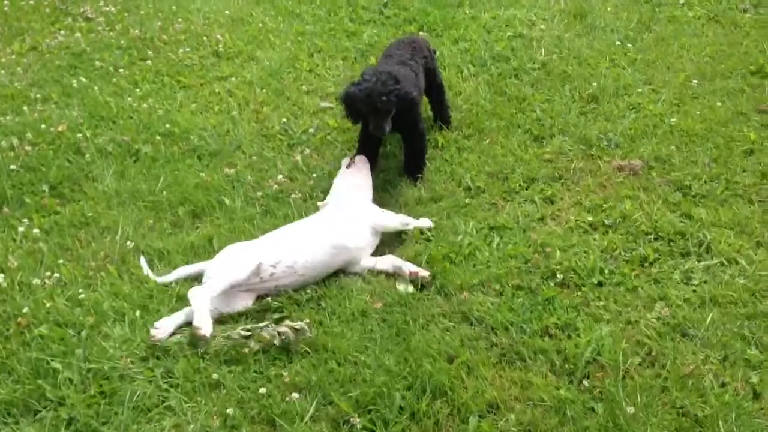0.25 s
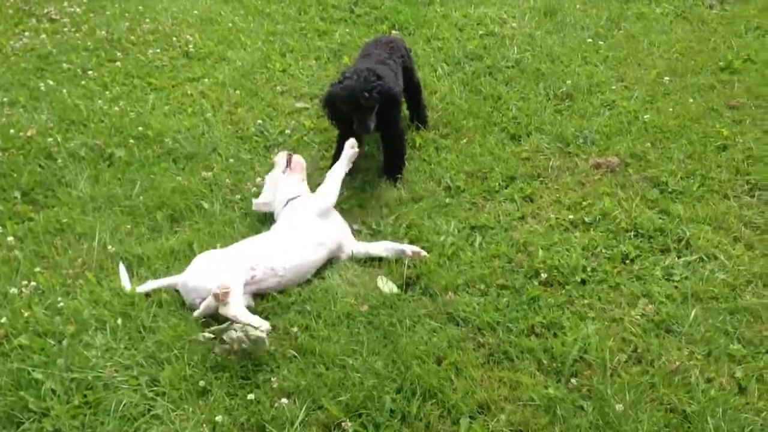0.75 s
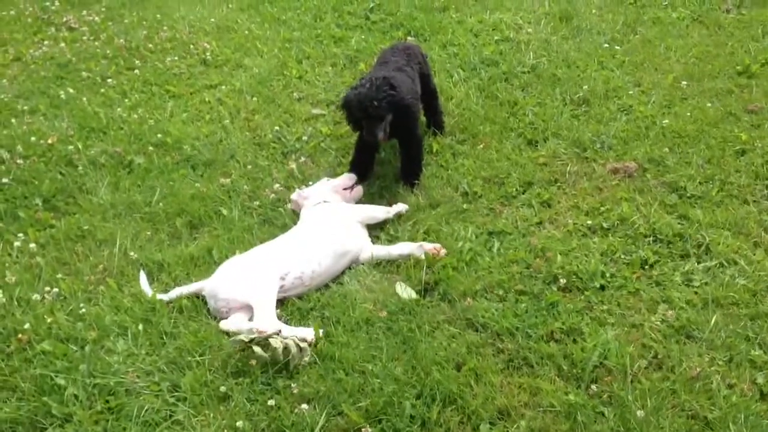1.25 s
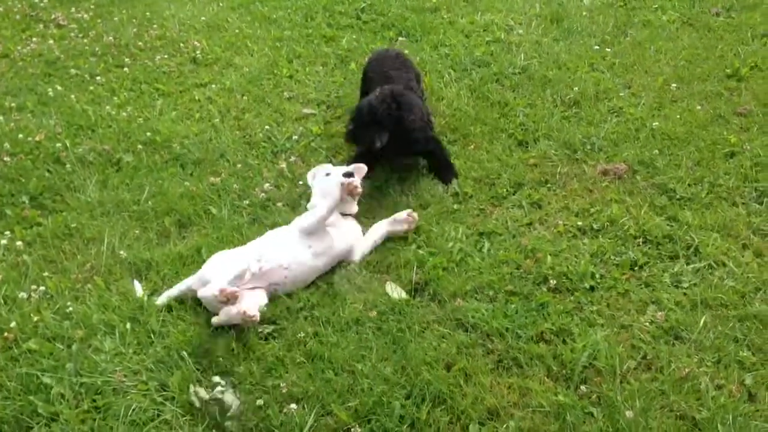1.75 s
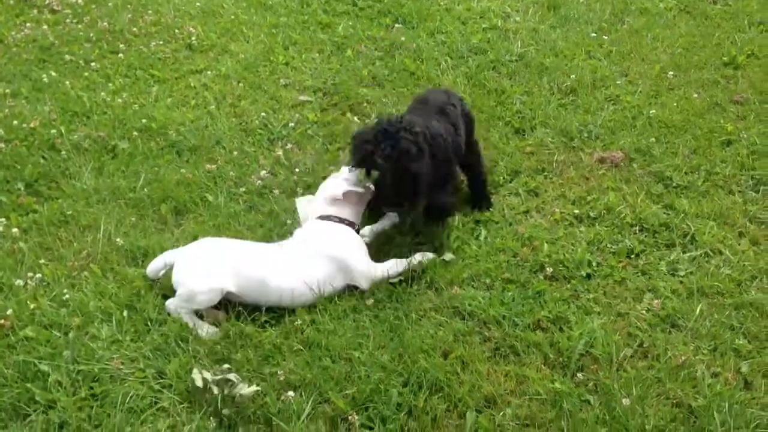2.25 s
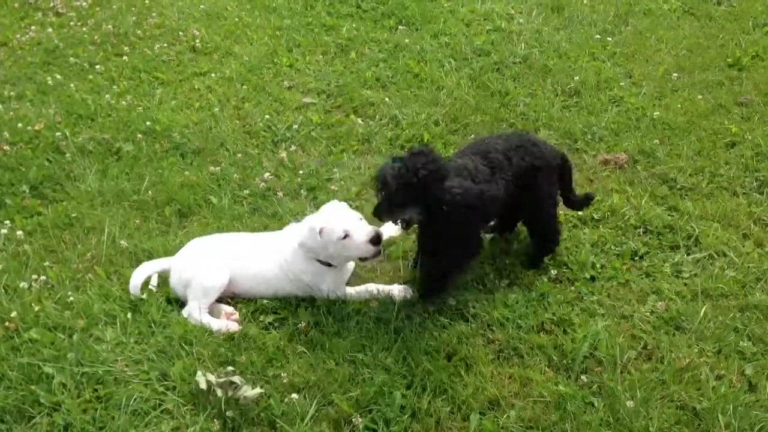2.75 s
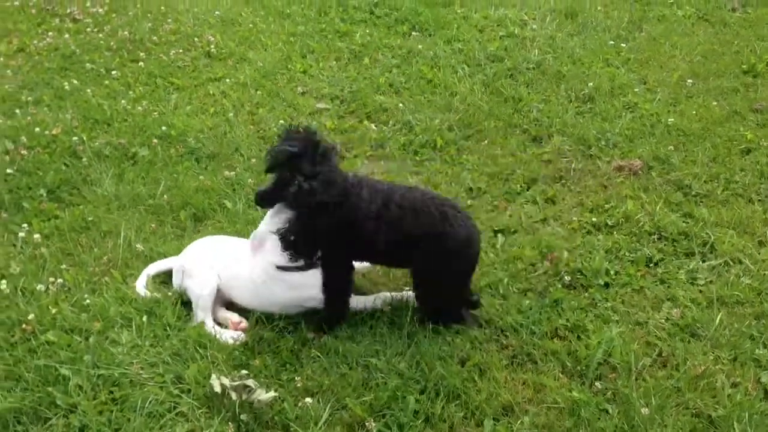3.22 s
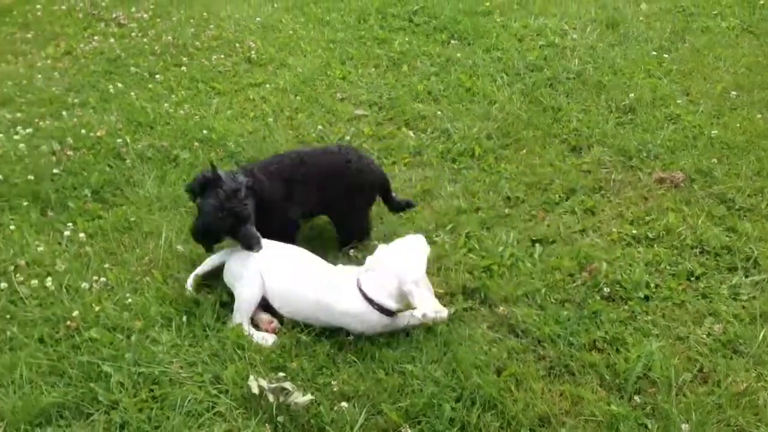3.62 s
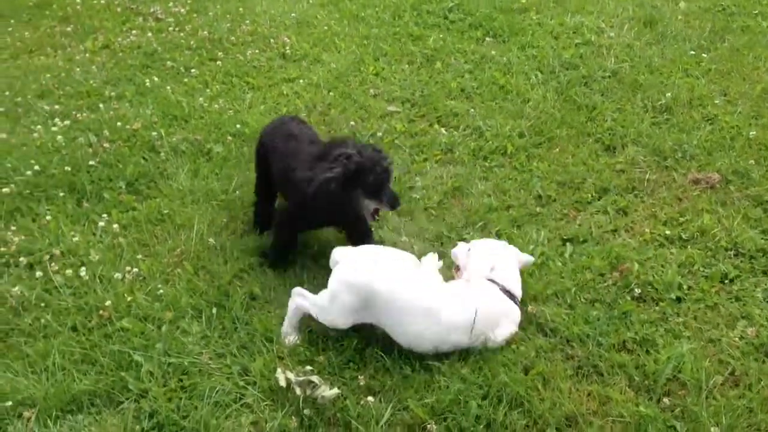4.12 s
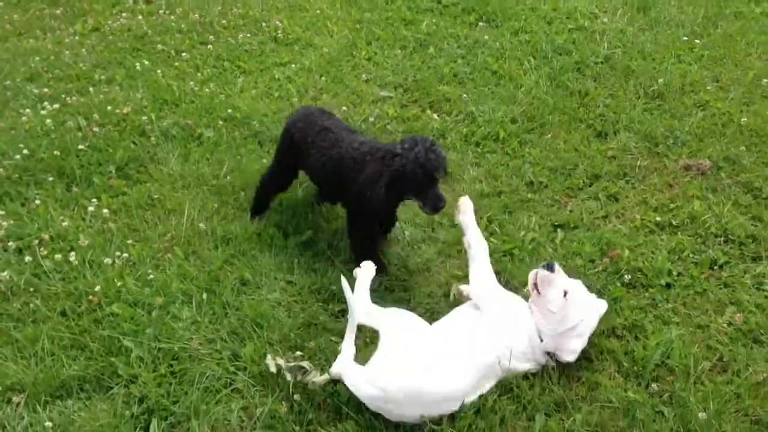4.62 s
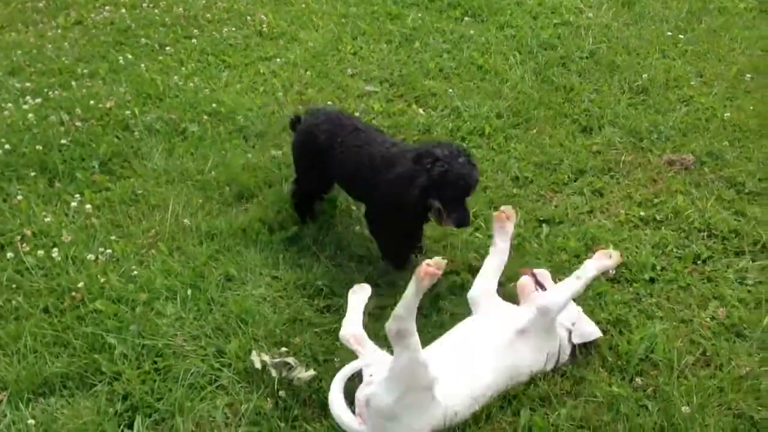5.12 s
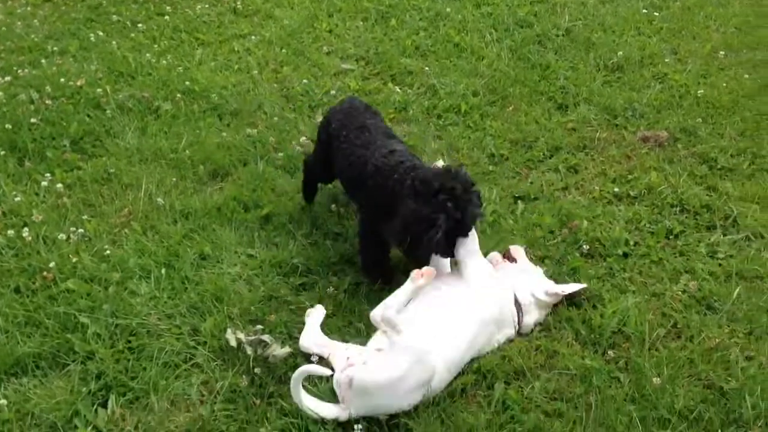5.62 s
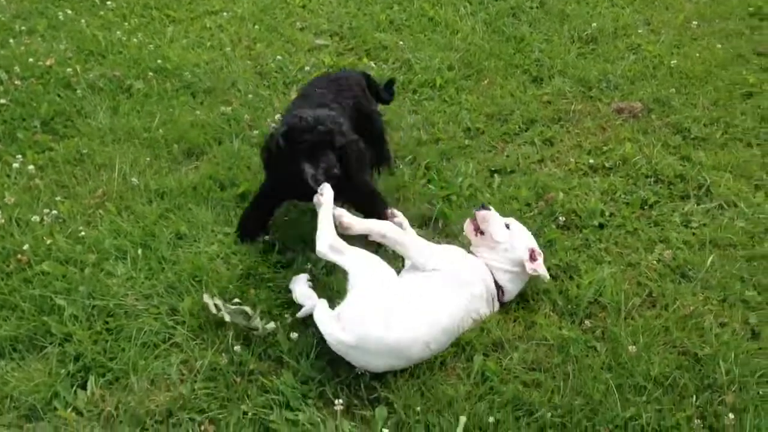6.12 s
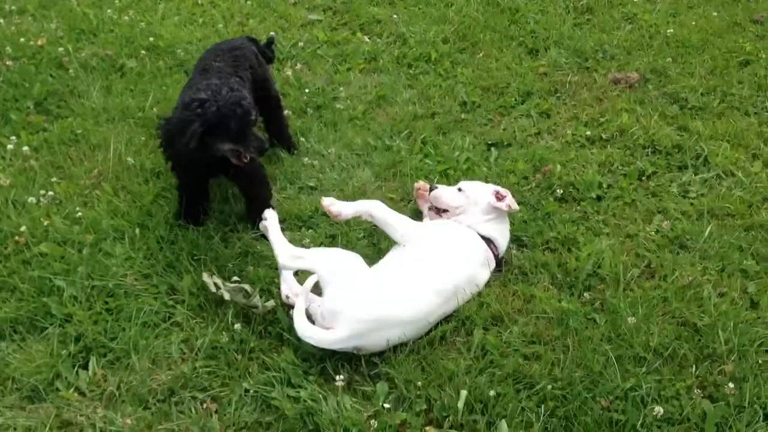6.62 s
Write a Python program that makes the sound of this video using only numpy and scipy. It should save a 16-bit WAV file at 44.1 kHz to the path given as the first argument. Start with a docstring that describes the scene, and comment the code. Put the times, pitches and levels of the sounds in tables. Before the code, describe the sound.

Outdoors on a lawn, with a faint airy hush like distant traffic, dogs tussle. Grass swishes and bodies bump dull turf; a piercing, very short bark jumps out. Low grunts and raspy growls answer it. After a quieter stretch with tiny wet clicks, a broken growl leads to an even higher yelping bark. Panting huffs end it. Simple mono pickup at modest distance, almost no reverberation, peaks squashed.

```python
"""Two dogs wrestle on a lawn: two shrill barks and throaty growls, voiced as harmonics shaped by resonances.
Breath huffs are swelling noise bands; mouth clicks and thuds on turf are short bursts of a few cycles.
Grass rustles as dense uneven snaps, over a soft outdoor hush of spectrally shaped noise.
A faint decaying tail and two echoes follow the dogs' voices, breath and clicks.
The recorder cuts bass and top, turns down on loud sound, recovers slowly and limits peaks."""
import sys
import numpy as np
from scipy import signal
from scipy.fft import rfft, irfft
from scipy.io import wavfile
from scipy.ndimage import uniform_filter1d, minimum_filter1d

SR = 44100
rng = np.random.default_rng(int(sys.argv[2]) if len(sys.argv) > 2 else 0)


def output_pcm(signal):
    """Save a mono or channel-first signal as 16-bit PCM at the path in sys.argv[1].

    Samples are clipped to [-1, 1] before scaling.
    """
    pcm = np.clip(np.atleast_2d(signal).T, -1, 1) * 32767
    wavfile.write(sys.argv[1], SR, np.round(pcm).astype(np.int16))


N = 302526


def from_db(db):
    """Amplitude ratio of a level: 20 dB per factor of ten."""
    return 10 ** (np.asarray(db) / 20)


def rms_one(x):
    """Normalise the root mean square, the square root of mean power, to 1."""
    return x / np.sqrt(np.mean(x ** 2) + 1e-20)


def at_hz(points, hz):
    """Interpolate a spectrum on a logarithmic frequency axis."""
    point_hz, point_db = np.array(points).T[:2]
    return np.interp(np.log(hz), np.log(point_hz), point_db)


def in_time(rows):
    """Linear interpolation in time turns table columns into sample curves."""
    s, *columns = np.transpose(rows)
    return [np.interp(np.arange(N) / SR, s, c) for c in columns]


def phrases(tables, fade_s):
    """Gating: join tables into curves and close a gate over pauses longer than 40 ms."""
    rows = np.concatenate(tables)
    t, gate = np.arange(N) / SR, np.zeros(N)
    for table in tables:
        gate[(t >= table[0][0]) & (t <= table[-1][0])] = 1
    bridge = SR // 25
    widened = -minimum_filter1d(-gate, size=bridge)
    gate = minimum_filter1d(widened, size=bridge)
    return uniform_filter1d(gate, size=max(int(fade_s * SR), 1)), in_time(rows)


def per_phrase(tables, constants):
    """Append to each row the constants of its phrase and its linear progress in time, 0 to 1."""
    extended = []
    for table, fixed in zip(tables, constants):
        start, end = table[0][0], table[-1][0]
        extended.append([(*row, *fixed, (row[0] - start) / (end - start)) for row in table])
    return extended


def drift(rate, size=N):
    """Low-pass random fluctuation: white noise through two equal poles at rate (Hz), rms 1."""
    r = np.exp(-2 * np.pi * rate / SR)
    settle = SR // 4
    noise = rng.standard_normal(size + settle)
    return rms_one(signal.lfilter([1], [1, -2 * r, r * r], noise)[settle:])


def resonance(x, hz, width_hz):
    """Damped resonator: a two-pole peak with gain 1 on top."""
    r = np.exp(-np.pi * width_hz / SR)
    edge = (1 - r * r) / 2
    return signal.lfilter([edge, 0, -edge], [1, -2 * r * np.cos(2 * np.pi * hz / SR), r * r], x)


def coloured(x, spectrum):
    """Spectral shaping: multiply the Fourier transform by a gain curve."""
    hz = np.maximum(np.fft.rfftfreq(N, 1 / SR), 1)
    return irfft(rfft(x) * from_db(at_hz(spectrum, hz)), N)


def noise_band(centre, width_hz):
    """Quadrature modulation: two slow noises carry a noise band to a moving centre."""
    turn = 2 * np.pi * np.cumsum(centre) / SR
    in_phase = drift(width_hz / 2, size=len(turn)) * np.cos(turn)
    return in_phase + drift(width_hz / 2, size=len(turn)) * np.sin(turn)


def swell(start, rise_s, fall_s, shape):
    """Smooth envelope: a power of a sine rises to 1 and falls again."""
    ramp = np.interp(np.arange(N) / SR, [start, start + rise_s, start + rise_s + fall_s], [0, 1, 0])
    return np.sin(np.pi / 2 * ramp) ** (2 * shape)


def throat(phase, pitch, centre, width_hz, noisy):
    """Source and filter: a resonance passes nearby harmonics and a share of air puffed each cycle."""
    tone, power = 0, 0
    for k in range(1, 24):
        gain = 1 / (1 + (2 * (k * pitch - centre) / width_hz) ** 2) ** 1.37
        tone = tone + gain * np.sin(k * phase - .35 * k * k)   # staggered phases
        power = power + gain ** 2 / 2
    air = noise_band(centre, width_hz) * (1 + .5 * np.cos(phase))
    noisy = np.clip(noisy, 0, 1)
    return np.sqrt(1 - noisy ** 2) * tone / np.sqrt(power) + noisy * air


def knocks(rows, cycles):
    """Damped contact: each event is a short swell of a few cycles at its own frequency."""
    out = np.zeros(N)
    for s, peak_db, hz in rows:
        t = np.arange(int(cycles / hz * SR)) / SR
        at = int(s * SR)
        envelope = np.sin(np.pi * t / t[-1]) ** 2
        out[at:at + len(t)] += from_db(peak_db) * envelope * np.cos(2 * np.pi * hz * t)
    return out


def hush():
    """Broadband ambience of far traffic and air: shaped noise, lumpy in the bass, fuller in the middle at first."""
    # spectrum of the hush: f/Hz, relative density/dB
    hush_spectrum = [(24, -65), (40, -37), (91, -13), (154, 1.5), (406, -11.5), (686, -9), (816, -12),
                     (880, -10), (2050, -12), (2570, -15), (4340, -17.5), (9630, -23.5), (15500, -30)]
    # hush over time: t/s, level/dB, extra level in the middle range/dB
    hush_level = [(0, -61.5, 8.5), (.8, -58.5, 6), (1.6, -59, 3.5), (2.5, -57.5, -1.6), (3.7, -57, -1.6),
                  (4.5, -56, -1.8), (5.4, -55.5, -3), (6.1, -58, -3), (6.86, -59.5, 0.5)]
    level_db, middle_db = in_time(hush_level)
    air = rms_one(coloured(rng.standard_normal(N), hush_spectrum))
    bass = signal.sosfilt(signal.butter(2, 330, fs=SR, output="sos"), air)
    middle = resonance(air, 490, 1500)
    lumps = (from_db(1.9 * drift(17)) - 1) * bass
    return from_db(level_db) * (air + lumps + (from_db(middle_db) - 1) * middle)


def rustle():
    """Superposed impulses: dense tiny blade snaps of uneven size merge into shaped noise."""
    # continuous stirring of grass under the dogs: t/s, level/dB
    stirring = [(0, -64.5), (.45, -63), (.8, -80), (2.9, -80.5), (3.2, -64), (3.7, -66.5), (4.7, -66.5),
                (5.0, -79.5), (6.86, -83.5)]
    # brief brushes of grass: start t/s, rise t/s, fall t/s, peak level/dB
    brushes = [(.1, 0.036, 0.05, -69), (.28, 0.05, 0.018, -54.5), (.52, 0.074, 0.16, -60),
               (.62, .08, 0.04, -57.5), (.93, 0.064, .1, -65), (2.11, 0.025, 0.034, -57.5),
               (2.239, .046, .08, -68), (2.41, 0.07, .04, -64), (3.1, 0.19, 0.32, -64),
               (4.4, .08, .06, -65), (4.8, 0.074, .04, -64)]
    # spectrum of the grass: f/Hz, relative density/dB
    grass = [(880, -21.5), (1500, 9), (2730, 3.5), (3150, 4.5), (5400, 6.5), (11700, 0.5), (15000, -0.5)]
    stirring_db, = in_time(stirring)
    level = from_db(stirring_db)
    for s, rise_s, fall_s, db in brushes:
        level = level + from_db(db) * swell(s, rise_s, fall_s, 1.6)
    snaps = rng.standard_normal(N) * from_db(1.8 * rng.exponential(1, N))
    return level * from_db(1.6 * drift(30)) * rms_one(coloured(snaps, grass))


def thuds():
    """Impact on a soft, lossy surface: turf swells at a low frequency and, weaker, at an overtone."""
    # paws and bodies on turf: t/s, peak level/dB, f/Hz
    contacts = [(0.126, -46.5, 170), (0.199, -41, 207), (0.264, -46.5, 156), (0.32, -48, 171),
                (0.587, -50, 136), (0.611, -50, 194), (0.643, -34, 184), (0.661, -41, 188),
                (0.694, -41.5, 148), (0.825, -45.5, 130), (1.131, -45, 140), (1.189, -37, 146),
                (1.207, -45, 175), (1.461, -49.5, 199), (4.182, -47, 177.6), (4.209, -58, 153),
                (4.375, -38.5, 162), (4.862, -47, 159), (5.278, -47, 168), (6.35, -50, 199.8),
                (6.365, -43.5, 204), (6.384, -44.5, 184.6)]
    overtone_ratio, overtone_db = 2.06, -14.5
    overtones = [(s, db + overtone_db, hz * overtone_ratio) for s, db, hz in contacts]
    return knocks(contacts, cycles=2.82) + knocks(overtones, cycles=3.8)


def growls():
    """Irregular vibration of slack folds: flutter adds side tones to the chest; mouth and teeth ring hoarsely."""
    # growls, a grunt and the chest tone leading into each bark, one list per phrase:
    # t/s, pitch f/Hz, chest level/dB, mouth level/dB, rasp level at palate and teeth/dB
    growl_phrases = [
        [(1.56, 214.4, -71, -72, -72), (1.59, 211.5, -63, -68, -71), (1.604, 217.6, -38, -72, -74),
         (1.632, 303.4, -32.5, -78, -82), (1.645, 318, -33, -70, -80)],
        [(2.245, 179.2, -59.5, -67.5, -81), (2.281, 196.9, -37, -68, -86), (2.325, 210, -39, -72, -86),
         (2.349, 175, -52, -73, -79), (2.37, 174.6, -68, -74, -76)],
        [(2.545, 250, -56, -59, -72.5), (2.56, 263, -36.5, -60.5, -62), (2.58, 272, -41.5, -54, -62),
         (2.62, 266, -46, -59, -59), (2.64, 268.9, -36, -47, -60), (2.68, 269.3, -39, -66, -72),
         (2.716, 271.9, -38, -66, -75), (2.74, 271, -39, -47.5, -60), (2.76, 309.4, -39, -44.5, -71),
         (2.786, 309.9, -46.5, -50.5, -50.5), (2.803, 299.8, -49, -59, -60), (2.81, 153.2, -45, -60, -63),
         (2.84, 151.1, -49.5, -67.5, -75), (2.88, 155.7, -72, -64.5, -72)],
        [(3.14, 243.9, -58.5, -66.5, -72), (3.18, 245.5, -47, -53, -71.5), (3.206, 245, -50, -59, -70),
         (3.25, 258.6, -42, -47, -58), (3.264, 267.8, -43, -42.5, -62), (3.29, 268.6, -47, -44, -58),
         (3.31, 232.3, -46, -52, -58), (3.345, 233.2, -50, -51.5, -52), (3.37, 251, -40.5, -36, -67),
         (3.386, 249, -53, -52.5, -53.5), (3.405, 250.8, -39, -39.5, -75), (3.425, 259.2, -56, -51, -58),
         (3.45, 248.7, -46, -51.5, -65), (3.5, 240.2, -47, -52.5, -61), (3.532, 183.6, -59, -55.5, -69),
         (3.6, 190.1, -73, -67.5, -73)],
        [(5.41, 169.9, -59, -66, -72), (5.432, 177.4, -43.5, -63, -77), (5.474, 231.7, -43.5, -61, -74),
         (5.5, 237, -53, -59, -69), (5.51, 172, -36.5, -57, -76), (5.528, 169, -33, -48.5, -72),
         (5.565, 224.8, -45.5, -47, -69), (5.62, 218.8, -42, -53.5, -68), (5.65, 196.5, -44.5, -58, -68),
         (5.704, 158.9, -39.5, -64, -72), (5.722, 160, -47, -65.5, -76), (5.742, 170.6, -31.5, -46, -68),
         (5.76, 170.7, -34, -50.5, -62), (5.79, 174.1, -32.5, -42.5, -67), (5.811, 177, -39, -33, -77),
         (5.816, 245.4, -29, -56, -70), (5.86, 241, -55, -52, -70)],
    ]
    # voice of each phrase: mouth f/Hz at start, at end, palate level above the teeth/dB at start, at end,
    # roughness (0-1), flutter f/Hz
    growl_voice = [(1000, 850, 0, 1.5, .4, 52), (1000, 1000, -3, 1.5, .08, 68),
                   (1000, 1350, 4.5, -26, 0.66, 83), (1117, 1200, -15, 0, .42, 70),
                   (904, 1100, 1, 3.5, .6, 65)]
    # resonances at palate and teeth: f/Hz, width/Hz
    palate_teeth = [(2300, 400), (3480, 520)]
    mouth_width_hz = 610
    gate, curves = phrases(per_phrase(growl_phrases, growl_voice), fade_s=.008)
    on = gate > 0
    (pitch, chest_db, mouth_db, teeth_db, first_hz, last_hz, palate_db, late_db,
     rough, flutter_hz, progress) = [c[on] for c in curves]
    rough = np.clip(rough, 0, 1)
    phase = 2 * np.pi * np.cumsum(pitch * (1 + 0.14 * rough * drift(59.77)[on])) / SR
    sides = 0
    for step, size in zip((1, -1, 2), (.65, .2, .3)):
        sides = sides + size * noise_band(pitch + step * flutter_hz, 45)
    chest = np.sin(phase) + 0.05 * np.sin(2 * phase) + rough * sides
    mouth_hz = first_hz + progress * (last_hz - first_hz)
    mouth = throat(phase, pitch, mouth_hz, mouth_width_hz, 0.94)
    rasp_levels_db = (teeth_db + palate_db + progress * (late_db - palate_db), teeth_db)
    teeth = 0
    for db, (hz, width) in zip(rasp_levels_db, palate_teeth):
        ring = throat(phase, pitch, np.full(len(pitch), hz), width, 0.93)
        teeth = teeth + from_db(db + 2.0 * drift(7.2)[on]) * ring
    upper = from_db(1.5 * drift(50)[on]) * (from_db(mouth_db) * mouth + teeth)
    out = np.zeros(N)
    out[on] = from_db(chest_db) * rms_one(chest) + upper
    # the chest radiates little below 120 Hz
    return signal.sosfilt(signal.butter(2, 120, "high", fs=SR, output="sos"), gate * out)


def wolf_tone(fold_pitch):
    """Biphonation: a second, independent vibration forms sum tones with the vocal folds."""
    # second vibration in the later bark: t/s, f/Hz, level of its own tone/dB
    second_vibration = [(5.868, 1012, -36), (5.9, 1030, -7.5), (5.914, 1030, -16.5), (5.918, 1012, -30)]
    gate, (hz, level_db) = phrases([second_vibration], fade_s=0.0062)
    turn = 2 * np.pi * np.cumsum(hz * (1 + 0.067 * drift(110))) / SR
    folds = 2 * np.pi * np.cumsum(fold_pitch) / SR
    tone = np.sin(turn) + 0.17 * np.sin(turn + folds) + .06 * np.sin(turn + 2 * folds)
    return np.sqrt(2) * gate * from_db(level_db) * tone


def barks():
    """Source-filter voice: fold harmonics excite five throat resonances, with hoarseness and hiss added."""
    # barks, one list each: t/s, pitch f/Hz, mouth size (factor on the resonances), first resonance level/dB,
    # then relative to it: second resonance level/dB, upper resonances level/dB, hiss level/dB
    bark_phrases = [
        [(1.606, 303.2, 1.28, -48.5, -1.5, -17, -30.5), (1.62, 317.7, 0.97, -19, 2, -11.5, -34),
         (1.626, 302, 0.96, -12.5, -6, -11, -34), (1.634, 318.6, 1.086, -11, -0.5, -8, -26.5),
         (1.644, 349.8, 0.97, -10.5, 0, -10.5, -22), (1.657, 381.8, 1.11, -8, 5.5, -5.5, -18.5),
         (1.661, 455, 1.01, -2.5, -0.5, -20, -32.5), (1.68, 455.2, 1, -6.5, 1.5, -7, -34),
         (1.7, 433.4, 0.95, -5.5, -3.5, -9.5, -37), (1.706, 421.1, 1, -6.5, -12, -9, -27),
         (1.716, 415.6, 1.06, -5.5, -26.5, -17, -29), (1.731, 410.8, 1.05, -10, -18.5, -11.5, -31),
         (1.738, 385.6, 1.04, -15, -2, -19, -35.5), (1.744, 325.6, 0.89, -27.5, 0, -3, -19.5),
         (1.775, 189.9, 1.02, -50.5, 5, -4.5, -8)],
        [(5.812, 298.3, 0.54, -38.5, 6, -2.5, -30.5), (5.83, 371.6, 0.64, -35, 11.5, -7.5, -37),
         (5.84, 458.1, 0.64, -28.5, 10.5, 0, -24), (5.85, 485.8, 0.59, -26.5, 17.5, -2.5, -20),
         (5.862, 598.2, .73, -21.5, 12, -3, -23), (5.876, 678, .88, -15, 8, -7.5, -23.5),
         (5.894, 724.7, 0.77, -15.5, 8.5, -20.5, -24), (5.912, 793, .98, -12.5, 4.5, -20, -26),
         (5.916, 756, .98, -14, 9, -19.5, -23.5), (5.934, 804, 1.01, -10, 0, -17, -29),
         (5.952, 803, 1.04, -9, -4, -15, -21.5), (5.957, 851.8, 1.04, -7.5, -15.5, -25.5, -29.5),
         (5.97, 861, 1.1, -7.5, -23.5, -29.5, -27.5), (5.979, 812.5, 0.89, -12.5, -6, -15.5, -34),
         (5.984, 706, 0.84, -16, 3.5, -24.5, -29.5), (5.99, 580.8, .8, -22, -5, -21, -29),
         (6.025, 258.9, 0.64, -50, -9, -4.5, -19.5)],
    ]
    # the five throat resonances of each bark at mouth size 1: f/Hz, low to high
    throat_hz = [(862, 1390, 2200, 3200, 5100), (773, 1560, 2350, 3600, 4900)]
    # per bark: fourth resonance level above the third/dB at start, middle, end;
    # fifth resonance level above the third/dB; hiss centre f/Hz at start, at end
    bark_top = [(-4.5, -14.5, -12, -24.5, 6200, 7600), (-23, 1, -2, -25.5, 8200, 7900)]
    # resonances, low to high: width/Hz, reach of hoarseness (factor), exponent on mouth size
    throat_shape = [(260, 1, 0.97), (296, 1.6, 1.0), (381, 2, 0.53), (705, 4.4, .6), (600, 2.4, 0.34)]
    # hoarseness of the barks: t/s, amount (0 clear, 1 and above rasping)
    hoarseness = [(1.606, .6), (1.625, .24), (1.645, .15), (1.659, .3), (1.668, .06), (1.735, .06),
                  (1.745, .25), (1.775, .4), (5.812, 1.6), (5.838, 1.2), (5.848, .45), (5.858, .14),
                  (5.88, .08), (5.895, .25), (5.912, .22), (5.925, .05), (5.975, .05), (6.0, .3)]
    throat_low_hz, dip_hz, dip_sharpness = 637.2, 5130, 9.5
    rasp_db = -23.5   # at hoarseness 1, relative to the voice
    # noisy share of a clear bark's hiss; level of broad air relative to the hiss resonance
    hiss_width_hz, hiss_noisy, air_db = 900, .55, -4

    gate, curves = phrases(per_phrase(bark_phrases, np.hstack([throat_hz, bark_top])), fade_s=0.0067)
    on = gate > 0
    (pitch, size, level_db, second_db, upper_db, hiss_db, *rest_hz, early_db, middle_db, late_db,
     fifth_db, first_hz, last_hz, progress, hoarse) = [c[on] for c in curves + in_time(hoarseness)]
    fourth_db = middle_db + (early_db - middle_db) * np.maximum(1 - progress / .4, 0)
    fourth_db = fourth_db + (late_db - middle_db) * np.maximum(progress / .5 - 1, 0)
    relative_db = [0 * second_db, second_db, upper_db, upper_db + fourth_db, upper_db + fifth_db]
    levels_db = level_db + np.array(relative_db)

    phase = 2 * np.pi * np.cumsum(pitch * (1 + 0.049 * hoarse * drift(180)[on])) / SR
    voice = 0
    for hz, db, (width, reach, follows) in zip(rest_hz, levels_db, throat_shape):
        ring = throat(phase, pitch, size ** follows * hz, width, reach * hoarse + .01)
        voice = voice + from_db(db) * ring
    # little radiates below the throat resonances
    voice = signal.sosfilt(signal.butter(5, throat_low_hz, "high", fs=SR, output="sos"), voice)

    # broad breath noise between the harmonics
    rasp_filter = signal.butter(3, [900, 3900], "band", fs=SR, output="sos")
    rasp = signal.sosfilt(rasp_filter, rng.standard_normal(len(phase)))
    loudness = np.sqrt(sum(from_db(2 * db) for db in levels_db))
    voice = voice + from_db(rasp_db) * np.sqrt(hoarse) * loudness * rms_one(rasp)

    jet = rng.standard_normal(len(phase)) * (1 + np.cos(phase))   # a puff at every opening
    jet = signal.sosfilt(signal.butter(3, [6460, 10500], "band", fs=SR, output="sos"), jet)
    hiss_hz = first_hz + progress * (last_hz - first_hz)
    hiss = throat(phase, pitch, hiss_hz, hiss_width_hz, hiss_noisy + hoarse)
    hiss = hiss + from_db(air_db) * rms_one(jet)

    out = np.zeros(N)
    out[on] = voice + from_db(level_db + hiss_db + 2.8 * drift(60)[on]) * rms_one(hiss)
    # a side cavity of the throat swallows a narrow band
    out = signal.lfilter(*signal.iirnotch(dip_hz, dip_sharpness, fs=SR), out + 1e-18)
    return gate * out + wolf_tone(curves[0])


def huffs():
    """Turbulence in the open mouth: noise excites a gliding resonance and two fixed ones; the high one peaks early."""
    # huffs of breath: start t/s, rise t/s, fall t/s, peak level/dB, main centre f/Hz at start, at end,
    # low side and high side level above the main/dB
    breaths = [(3.75, .072, 0.074, -54.5, 1743, 1853, -6.5, -8),
               (4.84, .1, 0.057, -48.5, 1610, 1907, -8.5, -9),
               (6.33, .1, 0.0596, -48.5, 2120, 1840, -15, -11.5),
               (6.71, 0.051, 0.074, -53.5, 1980, 2024, -12, -17)]
    # side resonances, low and high: f/Hz, width/Hz
    side_resonances = [(830, 530), (3450, 1700)]
    roundness = 0.6      # exponent of the swell: small is broad
    early_share = 0.4    # share of the rise at which the high side peaks
    low, high = [noise_band(np.full(N, hz), width) for hz, width in side_resonances]
    out = 0
    for s, rise_s, fall_s, db, first_hz, last_hz, low_db, high_db in breaths:
        centre = np.interp(np.arange(N) / SR, [s, s + rise_s + fall_s], [first_hz, last_hz])
        main = swell(s, rise_s, fall_s, roundness) * (noise_band(centre, 575) + from_db(low_db) * low)
        early = swell(s, early_share * rise_s, rise_s, roundness) * high
        out = out + from_db(db) * (main + from_db(high_db) * early)
    return from_db(2.0 * drift(48.6)) * out


def clicks():
    """Transient oscillation: each mouth click is a brief burst of about eleven cycles."""
    # mouth clicks: t/s, peak level/dB, f/Hz
    click_events = [(3.755, -48, 1620), (5.1684, -43, 1780), (5.239, -47.5, 1960), (5.2446, -45.5, 2013),
                    (5.2945, -46.5, 1570)]
    return knocks(click_events, cycles=11.4)


def surroundings(x):
    """Reflection and scattering: convolve with a dull exponential tail from walls and trees and two echoes."""
    # distinct returns from flat walls: delay t/s, level/dB
    echoes = [(.14, -50), (.225, -65.5)]
    tail_db, t60_s, cut_hz = -47, .55, 1800
    t = np.arange(SR) / SR
    response = rng.standard_normal(SR) * from_db(-60 * t / t60_s) * (t > .015)
    response = signal.sosfilt(signal.butter(2, cut_hz, fs=SR, output="sos"), response)
    response = from_db(tail_db) * response / np.linalg.norm(response)
    walls = np.zeros(SR)
    for delay_s, db in echoes:
        walls[int(delay_s * SR)] = from_db(db)
    response = response + signal.sosfilt(signal.butter(1, cut_hz, fs=SR, output="sos"), walls)
    return signal.fftconvolve(x, response)[:N]


def scene():
    """Linear superposition: dogs with their tail, turf, grass and hush."""
    dogs = barks() + growls() + huffs() + clicks()
    return (dogs + surroundings(dogs) + thuds() + rustle() + hush())[None]


def record(dry):
    """Dynamic range compression: gain ducks on loud sound and recovers slowly; peaks, bass and top are cut."""
    bass_cut_hz, top_cut_hz, ceiling = 110, 15400, .72
    duck_from_db, duck_slope, recovery_db_per_s = -15, 0.37, 4
    dry = signal.sosfilt(signal.butter(3, bass_cut_hz, "high", fs=SR, output="sos"), dry)
    ramp = recovery_db_per_s * np.arange(N) / SR
    level_db = 10 * np.log10(uniform_filter1d(dry[0] ** 2, size=SR // 50) + 1e-12)
    cut_db = duck_slope * np.maximum(level_db - duck_from_db, 0)
    # the deepest cut so far is held, less the recovery since
    ducked = dry * from_db(ramp - np.maximum.accumulate(cut_db + ramp))
    window = SR // 150   # centred, so the limiter looks a few ms ahead
    peak = -minimum_filter1d(-np.abs(ducked), size=window)
    limited = ducked * uniform_filter1d(ceiling / np.maximum(peak, ceiling), size=window)
    return signal.sosfilt(signal.ellip(10, .5, 70, top_cut_hz, fs=SR, output="sos"), limited)


dry = scene()
out = record(dry)
output_pcm(out)
```